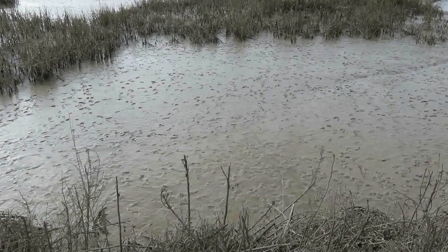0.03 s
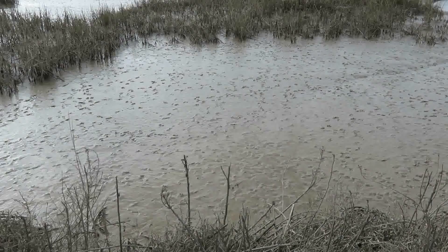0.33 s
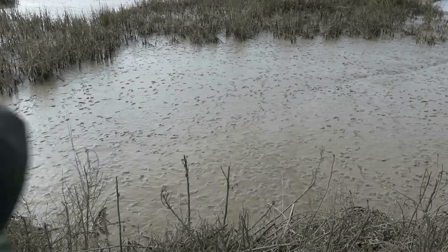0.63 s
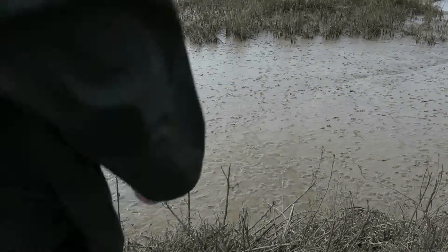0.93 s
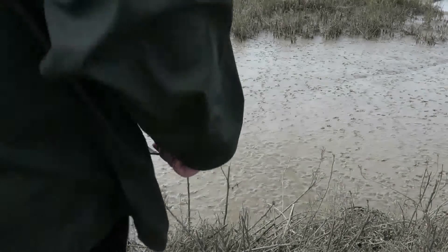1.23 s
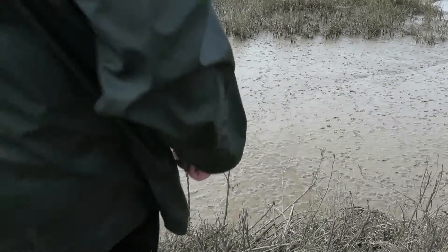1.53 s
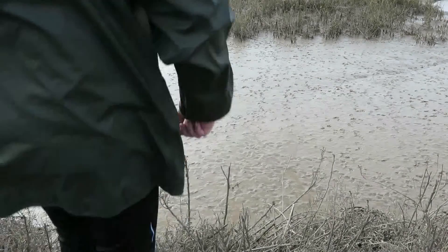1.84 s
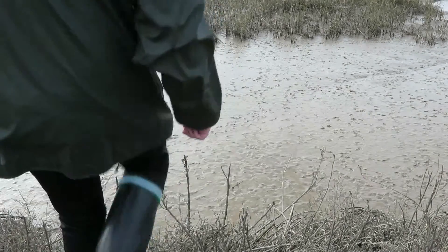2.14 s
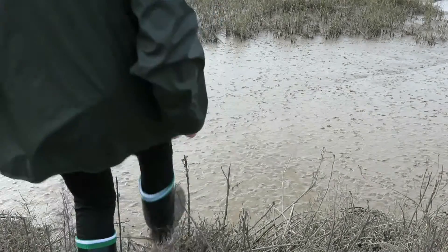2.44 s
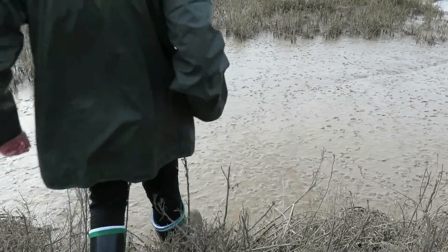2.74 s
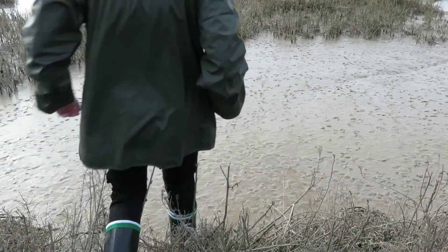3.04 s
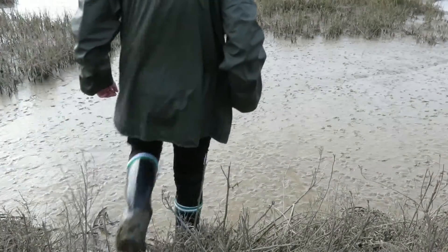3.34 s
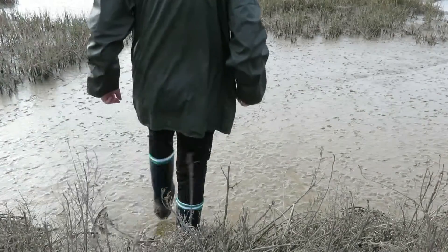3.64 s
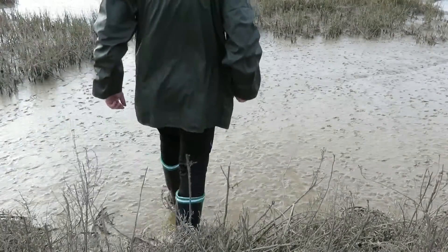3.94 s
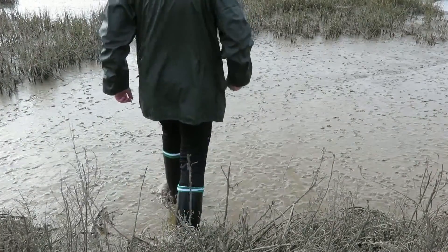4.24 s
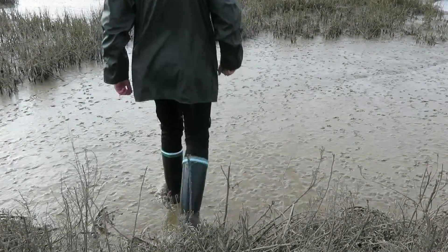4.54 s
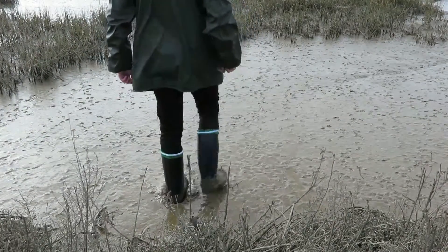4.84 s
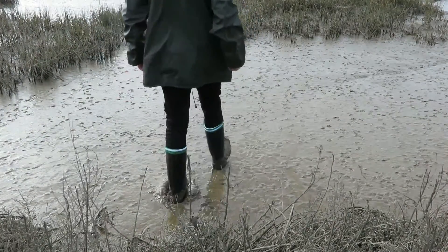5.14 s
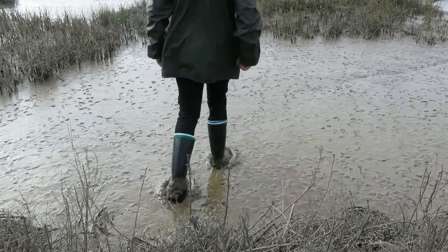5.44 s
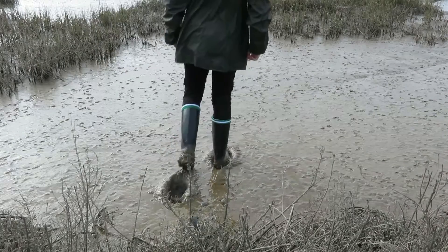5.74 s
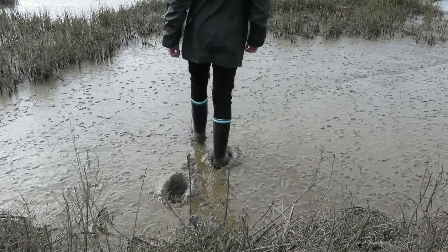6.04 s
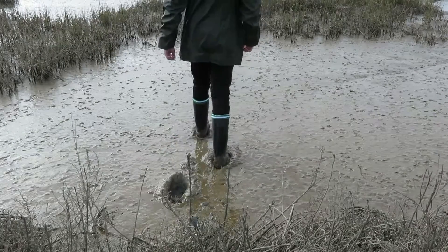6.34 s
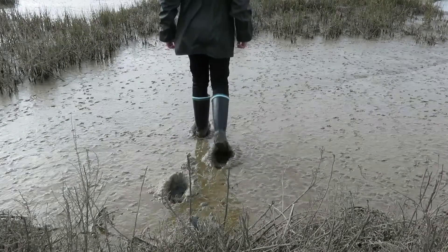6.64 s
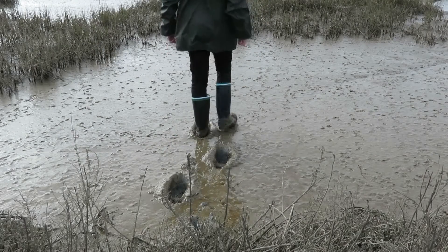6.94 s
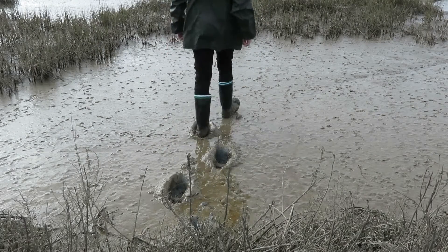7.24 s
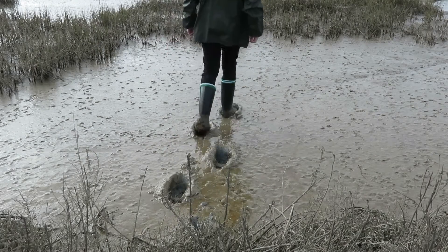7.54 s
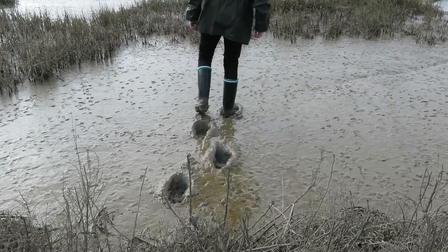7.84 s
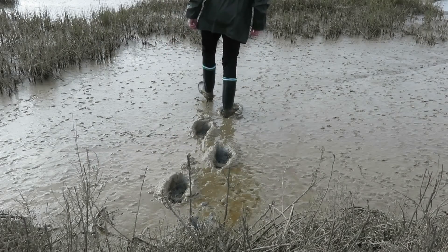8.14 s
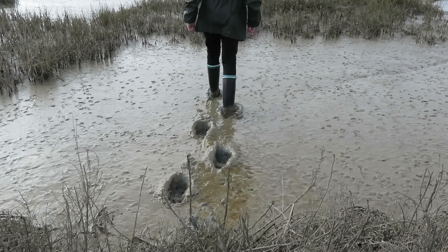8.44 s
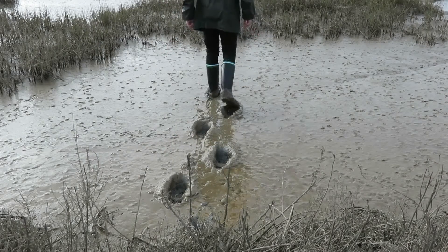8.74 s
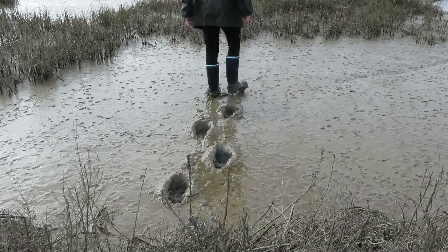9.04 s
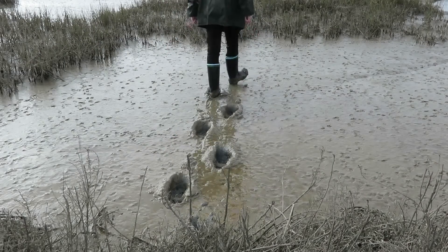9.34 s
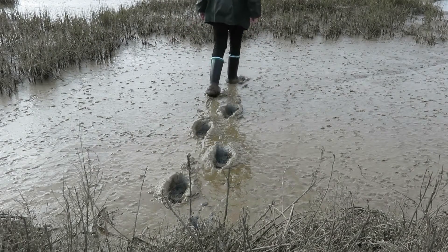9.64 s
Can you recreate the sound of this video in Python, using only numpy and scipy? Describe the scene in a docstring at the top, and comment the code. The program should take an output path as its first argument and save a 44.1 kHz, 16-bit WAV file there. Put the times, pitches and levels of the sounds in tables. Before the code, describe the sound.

Rubber boots brush through dry grass with stalks snapping, then squelch in wet mud, while wind gusts buffet the microphone.

```python
"""Boots through grass and mud

A walker in a waxed coat and rubber boots brushes through dry grass; stalks snap and crack.
Out on a mud flat the boots squelch and squeak, wet films click and trapped air gurgles.
Gusts and eddies buffet the microphone over the steady hush of open country."""
import sys
import numpy as np
from scipy.fft import rfft, irfft, next_fast_len
from scipy.io import wavfile
from scipy.ndimage import uniform_filter1d, map_coordinates

SR = 44100
rng = np.random.default_rng(int(sys.argv[2]) if len(sys.argv) > 2 else 0)


def generate_wav(sig):
    """Save sig (samples, or channels by samples) to the path in sys.argv[1] as 16-bit PCM at SR."""
    pcm = np.round(np.clip(np.atleast_2d(sig).T, -1, 1) * 32767).astype(np.int16)
    wavfile.write(sys.argv[1], SR, pcm)


N = 426888
TIME_S = np.arange(N) / SR

# Table levels precede each source's gain.
# air and slurry forced past a boot: (crest [s], rise [s], fall [s], level [dB], pitch [Hz], spray [dB])
BOOT_SQUELCHES = [(4.15, 0.0036, 0.016, -37, 2580, -2), (4.194, 0.0054, 0.035, -38.5, 1900, -13),
                  (5.367, 0.012, 0.037, -46, 2800, 1), (5.439, .001, 0.011, -29, 660, -30),
                  (5.4404, 0.0061, 0.0073, -23.5, 2100, -11.5), (5.447, 0.0025, .002, -26, 2850, -3),
                  (5.454, 0.0018, .008, -35, 2200, -11), (6.395, 0.0059, 0.035, -51.5, 2680, 6.5),
                  (7.501, 0.003, .012, -26, 1980, -22), (7.509, 0.004, 0.007, -13.5, 2980, -18),
                  (7.516, .002, 0.0083, -16, 2950, -19), (7.518, 0.00026, 0.0041, -15, 2880, -17),
                  (7.526, 0.004, 0.0092, -20, 2900, -5.5), (7.534, .002, 0.0012, -14, 2830, -21),
                  (7.5462, 0.0019, 0.0024, -10, 2900, -17), (7.55, 0.00035, 0.0025, -13.5, 1550, -22),
                  (7.551, 0.0006, 0.0029, -7, 2900, -16), (7.552, .001, .002, -8.5, 4280, -12),
                  (7.5555, 0.00067, 0.0027, -15, 2750, -12), (8.492, 0.0021, 0.0069, -42, 2840, -14),
                  (8.614, 0.0034, 0.0086, -36, 2880, -14)]
# mud pocket modes: (ratio to pitch [1], width [Hz], gain [dB])
POCKET_MODES = [(.25, 455, -41), (.53, 170, 3.5), (.78, 220, 2.5), (1, 190, 7.5), (1.27, 130, -0.5),
                (1.5, 350, -0.5), (1.86, 380, -17)]
# heel suction letting go: (time [s], level [dB], pitch [Hz], decay [s])
HEEL_SMACKS = [(5.4382, -7, 1770, 0.00071), (5.4385, -14, 960, .0018), (5.44, -26, 660, .007),
               (7.5176, -5, 2250, .0007), (7.5465, -15.5, 286, 0.0062), (7.5497, -15, 990, .0007),
               (7.5515, -17.5, 610, 0.0024)]
# wet films parting under the soles: (time [s], crack [dB], ring [dB], ring pitch [Hz])
FILM_CLICKS = [(4.5984, -39, -31.5, 5060), (4.648, -35, -43, 4500), (5.3567, -48, -32, 4800),
               (5.3625, -50, -28, 2490), (5.373, -45, -30, 3800), (5.6316, -46, -41, 13000),
               (5.6426, -42, -39, 13000), (5.6585, -35, -29, 12500), (5.6999, -27.5, -32, 10900),
               (6.3784, -39, -35, 2000), (6.6667, -37, -47, 13000), (7.2724, -42, -33, 4000),
               (7.4036, -26.5, -25.5, 4970), (7.7119, -32, -23, 12000), (8.4884, -25.5, -32, 4470),
               (8.7176, -42, -31, 11000), (8.7382, -47, -31, 3820), (8.8231, -26, -29, 3000),
               (8.8553, -44, -45, 2900), (8.881, -48, -41, 10500), (9.5706, -32.5, -18.5, 8700)]
# mud oozing as a boot sinks or lifts: (start [s], length [s], level [dB])
OOZE_SPANS = [(5.36, 0.15, -54), (5.63, 0.049, -48.5), (5.78, 0.033, -57), (6.33, 0.17, -60),
              (6.5, 0.52, -61), (7.28, 0.017, -56), (7.69, 0.055, -58), (8.54, 0.17, -61.5),
              (9.46, .02, -59), (9.58, 0.096, -64)]
# trapped air ringing in boot holes: (start [s], length [s], level [dB], pitch [Hz])
BUBBLE_STRINGS = [(4.133, 0.006, -31.5, 3160), (5.461, 0.0036, -34, 2250), (5.479, 0.0037, -36, 2550),
                  (5.968, 0.004, -42.5, 3500), (6.222, 0.004, -44, 3140), (6.347, 0.0047, -39, 3040),
                  (7.086, 0.004, -37.5, 2480), (7.402, 0.008, -40, 3100), (7.955, 0.022, -39, 2310)]
# boot shaft rubbing: (time [s], level [dB], pitch [Hz])
SQUEAK_CURVE = [(4.19, -75, 1980), (4.23, -51, 1950), (4.27, -47, 1910), (4.31, -44, 1830),
                (4.35, -75, 1800)]

# steady brushing of coat and grass: (time [s], swish [dB], hiss [dB])
BRUSH_CURVE = [(.45, -53, -65.5), (.64, -47, -61), (1.1, -54.5, -60.5), (1.5, -54.5, -58.5),
               (2.0, -63, -62.5), (2.35, -57, -56.5), (2.45, -53, -49.5), (2.6, -52, -47.5),
               (2.85, -48, -50.5), (3.05, -45, -51.5), (3.4, -49, -48), (3.65, -53, -45), (3.9, -61, -65),
               (4.2, -56.5, -62.5), (4.75, -63, -62)]
# sleeve or boot swings through grass: (start [s], length [s], swish [dB], hiss [dB])
BRUSH_STROKES = [(.7, .06, -47, -51), (.77, 0.074, -36.5, -46.5), (.92, .04, -47, -50.5),
                 (1.235, .11, -50, -48), (1.65, 0.099, -45, -52.5), (2.16, 0.09, -55, -51),
                 (2.47, .16, -46, -45.5), (2.95, 0.15, -50, -52.5), (3.24, .06, -52, -47),
                 (3.46, .1, -46.5, -47.5), (3.74, .03, -54, -50)]
# dry stalks and coat folds snapping: (time [s], crack [dB], ring [dB], ring pitch [Hz])
STALK_SNAPS = [(.499, -31, -38, 4300), (.5387, -31, -28, 3380), (.555, -24, -24, 3400),
               (.6633, -47, -29, 2400), (.6908, -41, -33, 4000), (.7062, -46, -28, 2500),
               (.7427, -46, -34, 6040), (.7646, -29, -20.5, 4600), (.8177, -17.5, -16, 7500),
               (.9462, -36, -33, 4300), (1.1822, -34, -34, 2900), (1.2296, -28.5, -31, 6240),
               (1.4112, -36, -32, 3320), (1.6541, -24.5, -41, 5060), (1.6915, -37, -22, 5200),
               (1.7225, -28.5, -45, 2300), (1.902, -30, -37, 2200), (1.9759, -35, -30, 4230),
               (2.0263, -32, -30, 13000), (2.2004, -40, -32, 3880), (2.5231, -46, -23, 13000),
               (2.5486, -30, -48, 2100), (2.5994, -26, -20, 12000), (2.6235, -21.5, -21, 9000),
               (2.6548, -26, -33, 6000), (2.6892, -27, -31, 7700), (2.7506, -34, -41, 7300),
               (2.7742, -25.5, -27, 3500), (2.88, -28.5, -26, 13500), (2.9487, -42, -34, 4400),
               (2.9776, -27, -28, 2000), (3.003, -30, -22.5, 3070), (3.1228, -18.5, -31, 3600),
               (3.238, -45, -47, 2100), (3.2944, -38, -28, 2600), (3.5533, -41, -34, 2300),
               (3.6933, -17.5, -29, 3620), (3.802, -27.5, -37, 5750)]
# thick stalks cracking under a heel: (time [s], level [dB], pitch [Hz], decay [s])
STALK_CRACKS = [(1.6925, -19, 5000, .0003), (2.9497, -22, 4380, .0005), (2.966, -23, 3000, .0002),
                (3.0025, -12.5, 2240, 0.00059), (3.0035, -18, 5400, 0.00025),
                (3.0048, -14.5, 3600, 0.00046), (3.0207, -24, 3400, .0005), (3.1237, -9, 3380, .00042),
                (3.124, -12.5, 2280, 0.00056), (3.151, -16, 2610, .0006), (3.6945, -19, 3630, .0005)]

# light air: (time [s], level [dB])
BREEZE_CURVE = [(0.08, -29), (0.24, -40), (0.44, -42), (0.6, -34.5), (0.8, -24), (1.0, -40), (1.42, -25),
                (1.7, -29.5), (2.11, -37.5), (2.4, -28), (2.86, -41), (3.08, -30), (3.42, -28),
                (4.02, -23.5), (4.25, -32.5), (4.76, -39), (4.92, -35), (5.3, -42), (5.51, -55),
                (5.65, -49.5), (6.3, -51), (7.18, -59.5), (7.92, -43), (8.36, -30), (8.98, -44),
                (9.38, -35.5), (9.68, -44)]
# gusts on the microphone: (start [s], length [s], level [dB])
GUST_SPANS = [(.172, 0.0094, -27.5), (.305, 0.085, -23.5), (.509, 0.017, -27), (.768, 0.031, -17.5),
              (.808, 0.042, -22.5), (.855, 0.023, -19), (.92, 0.037, -27), (1.195, 0.12, -27.5),
              (1.23, 0.039, -24.5), (1.375, 0.06, -21.5), (1.455, 0.07, -19.5), (1.535, 0.055, -18),
              (1.59, 0.036, -21), (1.742, 0.047, -22.5), (1.878, 0.075, -16), (2.0, 0.019, -23),
              (2.188, 0.022, -15.5), (2.21, 0.047, -24), (2.27, 0.16, -16.5), (2.445, 0.052, -16),
              (2.58, 0.045, -23), (2.725, 0.0099, -29.5), (2.951, 0.068, -15), (3.025, 0.041, -14),
              (3.075, 0.056, -16), (3.15, 0.065, -23), (3.304, 0.087, -15.5), (3.458, .03, -24.5),
              (3.495, 0.084, -21), (3.6, 0.015, -26.5), (3.679, 0.092, -18), (3.785, 0.023, -20),
              (3.895, 0.037, -16.5), (4.05, .012, -20.5), (4.1, 0.027, -15.5), (4.18, 0.024, -21.5),
              (4.283, 0.051, -19.5), (4.35, 0.1, -23), (4.45, 0.014, -15), (4.475, 0.028, -27),
              (4.518, 0.012, -19), (4.56, 0.08, -22.5), (4.808, 0.046, -21.5), (4.952, 0.0092, -29),
              (4.985, .01, -29.5), (5.145, 0.0095, -26.5), (5.25, 0.037, -30.5), (5.365, 0.074, -32.5),
              (5.727, .008, -26), (5.78, 0.02, -29.5), (5.81, .075, -37), (5.94, 0.078, -40.5),
              (6.11, 0.011, -42), (6.345, .012, -44), (6.755, 0.024, -31), (6.825, 0.012, -32),
              (6.865, 0.035, -34), (6.93, 0.02, -31.5), (6.975, 0.037, -32), (7.065, 0.0086, -33.5),
              (7.47, 0.13, -37.5), (7.86, 0.02, -36.5), (7.98, 0.018, -34.5), (8.138, 0.021, -30.5),
              (8.187, 0.02, -27), (8.28, 0.0073, -27.5), (8.365, 0.024, -25), (8.413, 0.044, -18),
              (8.488, 0.0081, -17.5), (8.545, 0.042, -23.5), (8.635, 0.024, -25.5), (8.685, 0.011, -21.5),
              (8.73, 0.029, -32), (9.022, 0.039, -29), (9.203, 0.04, -26.5), (9.293, 0.023, -22.5),
              (9.463, 0.018, -23), (9.652, 0.0085, -35)]
# hardest eddies: (time [s], thump [dB], core [dB])
HARD_EDDIES = [(.3365, -6, -18), (.3963, -9.5, -30), (.771, -5.5, -23), (.821, -2, -16), (.8305, -5, -11),
               (.8342, 0.5, -5.5), (1.4667, -0.5, -7), (1.8851, -10, -13), (1.9058, 1, -4.5),
               (1.9289, -1, -8.5), (1.9736, -2, -6.5), (2.293, -5, -15), (2.3625, -4, -15.5),
               (2.466, 1, -6.5), (2.4849, -4, -8.5), (2.5288, -5.5, -16), (3.047, -2, -14),
               (3.0655, -0.5, -20), (3.3128, 0, -18), (3.383, -4, -33), (3.5081, 2, -8), (3.7408, -4, -19),
               (3.7537, -5, -9), (3.794, -6, -10.5), (3.9007, -3, -10.5), (4.1147, 1.5, -23),
               (4.2928, -4, -27), (4.321, -13, -13), (4.4595, -1, -20), (4.8244, -16, -20.5),
               (8.195, -10.5, -31), (8.427, -1, -20), (8.439, -10, -13), (8.4495, 1.5, -15.5),
               (8.49, -6, -31), (8.5006, -4, -39)]

# noise spectra: (frequency [Hz], relative density [dB])
SWISH_SPECTRUM = [(700, -16), (1350, -5), (2000, -4), (3200, -5), (5000, -5.5), (7500, -8.5), (14000, -20)]
HISS_SPECTRUM = [(2000, -6), (4500, 4.5), (6200, 4.5), (8000, 0), (10500, 3), (13000, 9), (14300, -1),
                 (15500, -26)]
CRACK_SPECTRUM = [(500, -14), (1500, 0), (5000, -1.5), (10000, -0.5), (13000, 6.5), (15500, -3)]
RUMBLE_SPECTRUM = [(15, -18), (30, -17), (60, -4.5), (100, -1), (180, -3.5), (350, -36), (900, -75)]
BUFFET_SPECTRUM = [(15, -35), (30, -30), (60, -22), (110, -5), (200, 0), (300, -3.5), (450, -15.5),
                   (700, -25.5), (950, -49), (1300, -56), (2500, -93)]
SWIRL_SPECTRUM = [(100, -46), (250, -7), (400, 3.5), (650, -3), (950, -10), (1250, -21), (1500, -26.5),
                  (2500, -36.5), (5000, -63)]
HUSH_SPECTRUM = [(60, -21), (200, -5), (450, -4), (700, 0.5), (900, 1.5), (1100, -2), (1350, -6.5),
                 (2200, -11), (3200, -14), (5000, -18.5), (9500, -29), (15000, -30)]
# left-right likeness: (frequency [Hz], coherence [1])
GRASS_COHERENCE = [(1500, 1), (3100, 0.95), (7000, 0.97), (13000, 0.18)]
WIND_COHERENCE = [(60, .999), (140, 1), (280, 0.99), (600, 0.87), (1200, 0.57)]
HUSH_COHERENCE = [(300, 1), (800, 0.99), (1500, 0.89), (3100, 0.66), (7000, 0.27), (14000, 0.13)]


def squelches():
    """The seal round a boot tears: wet pops ring an air pocket and throw fine spray."""
    out, t = np.zeros((2, N)), np.arange(SR // 3) / SR - .1
    for s, rise_s, fall_s, db, pitch_hz, spray_db in BOOT_SQUELCHES:
        # flow stops once the pocket fills
        gate = np.clip(3 - t / fall_s, 0, 1) * np.clip((.06 - t) / 0.012, 0, 1)
        flow = pulse(t, rise_s, fall_s) * gate
        bursts = flow * crackle(len(t), rate_hz=3000, scatter_db=1.2, bed=1.0)
        ring = unit(filtered(bursts, lambda hz: mud_pocket(hz, pitch_hz)))
        spray = amp(spray_db) * coloured(bursts, HISS_SPECTRUM)
        wet = spread(ring + spray, [(1600, 1.0), (5000, 0.96), (14000, 0.83)])
        add(out, s + t[0], amp(db) * rms(flow) * wet)
    return out * amp([[-.25], [.25]])


def mud_pocket(hz, pitch_hz, tear_db=-17):
    """Air pocket response: modes of alternating sign plus the low-passed tear."""
    modes = sum((-1) ** k * amp(db) * resonance(hz, ratio * pitch_hz, width_hz)
                for k, (ratio, width_hz, db) in enumerate(POCKET_MODES))
    return modes + amp(tear_db) / (1 + 1j * hz / pitch_hz)


def pops(rows):
    """A stalk or heel suction gives way at once, leaving a short, dry ring."""
    out, t = np.zeros((2, N)), np.arange(SR // 40) / SR
    for s, db, hz, decay_s in rows:
        add(out, s, amp(db) * np.sin(2 * np.pi * hz * t) * np.exp(-t / decay_s))
    return out


def film_clicks():
    """Wet films part under the soles."""
    return ticks(FILM_CLICKS, rise_s=0.00027, decay_s=0.0015, tail_s=0.016, tail_db=-18,
                 crack_db=-2, ring_db=-4.5, q=2.9, coherence=[(3000, 0.99), (12000, 0.89)])


def ooze(gain_db=-2, seep_db=-69, fade_db_per_s=3, ping_db=2):
    """Tiny bubbles burst as mud closes round a boot; the prints seep on, fading as the walker leaves."""
    fizz, = swells(OOZE_SPANS, attack_s=0.036, release_s=0.037)
    in_mud = np.interp(TIME_S, [4.7, 4.85], [0, 1])
    seep = amp(seep_db - fade_db_per_s * (TIME_S - OOZE_SPANS[0][0]))
    bursts = crackle(N, rate_hz=440, scatter_db=3, bed=0.52)
    froth = spread(coloured(bursts, HISS_SPECTRUM), [(4000, 1.0), (13000, 0.66)])
    pings = grains(count=1800, centre_hz=10500, pitch_scatter=.28, decay_cycles=1.6, scatter_db=6)
    return in_mud * amp(gain_db) * np.hypot(fizz, seep) * unit(froth + amp(ping_db) * pings)


def bubbles(rise_s=0.000092, decay_s=0.0014, rate_hz=260, pitch_scatter=0.039, glide_per_s=6):
    """Escaping air rings as quick strings of bubbles, each rising slightly in pitch."""
    out, t = np.zeros((2, N)), np.arange(SR // 40) / SR
    envelope = np.exp(-t / decay_s) * (1 - np.exp(-t / rise_s))
    for s, length_s, db, hz in BUBBLE_STRINGS:
        for delay_s in np.arange(0, length_s, 1 / rate_hz):
            pitch_hz = hz * np.exp(pitch_scatter * rng.standard_normal())
            ring = envelope * np.sin(2 * np.pi * pitch_hz * t * (1 + glide_per_s * t / 2))
            jitter_s = .5 * rng.random() / rate_hz
            add(out, s + delay_s + jitter_s, 1.8 * amp(db - 6 * delay_s / length_s) * ring)
    return out


def squeak(waver=0.06, flutter_db=3):
    """Wet rubber sticks and slips: a faint, rough tone that sags in pitch."""
    db, hz = curves(SQUEAK_CURVE)
    phase = 2 * np.pi * np.cumsum(hz * (1 + waver * wobble(400))) / SR
    return during(SQUEAK_CURVE) * amp(db + flutter_db * wobble(149.7)) * np.sin(phase)


def rustle(swish_gain, hiss_gain, swish_db=-1, clump_db=2, blade_db=-2):
    """Coat and dry grass rub in small slips, folds buckle and blades tick, while on the bank."""
    on_bank = np.interp(TIME_S, [.4, .5, 4.7, 4.85], [0, 1, 1, 0])
    clumps = amp(clump_db * wobble(45))
    folds = grains(count=3000, centre_hz=3600, pitch_scatter=.43, decay_cycles=1.5, scatter_db=2.2)
    blades = grains(count=4500, centre_hz=10500, pitch_scatter=0.24, decay_cycles=4, scatter_db=3.2)
    soft_slips = coloured(crackle(N, rate_hz=600, scatter_db=1.4, bed=1.0), SWISH_SPECTRUM)
    crisp_slips = coloured(crackle(N, rate_hz=700, scatter_db=1.2, bed=1.0), HISS_SPECTRUM)
    swish = unit(clumps * (spread(soft_slips, GRASS_COHERENCE) + folds))
    hiss = unit(clumps * (spread(crisp_slips, GRASS_COHERENCE) + amp(blade_db) * blades))
    return on_bank * (swish_gain * amp(swish_db) * swish + hiss_gain * hiss)


def brushing():
    """Swish and hiss gains: single strokes over steady brushing."""
    return np.hypot(amp(curves(BRUSH_CURVE)), swells(BRUSH_STROKES, attack_s=0.055, release_s=0.032))


def stalk_snaps(hiss_gain, count=85, scatter_db=5.5, centre_hz=5800, pitch_scatter=0.69):
    """Stalks and folds snap: listed breaks plus random ones, densest where brushing is hardest."""
    effort = hiss_gain * during(BRUSH_CURVE)
    at = rng.choice(N, size=count, p=effort / effort.sum())
    size, pitch = rng.standard_normal((count, 2)).T
    db = 20 * np.log10(hiss_gain[at]) + 5 + scatter_db * size
    small_snaps = np.c_[at / SR, db, db - 7, centre_hz * np.exp(pitch_scatter * pitch)]
    return ticks([*STALK_SNAPS, *small_snaps], rise_s=0.00029, decay_s=0.0031, tail_s=0.0091,
                 tail_db=-12.5, crack_db=-5, ring_db=-7, q=2.7, coherence=[(3000, 0.99), (12000, 0.99)])


def ticks(rows, rise_s, decay_s, tail_s, tail_db, crack_db, ring_db, q, coherence):
    """A sudden break: broad crack, after-crackles and a short ring at the broken piece's pitch."""
    out, t = np.zeros((2, N)), np.arange(SR // 14) / SR - .01
    envelope = pulse(t, rise_s, decay_s) + amp(tail_db) * pulse(t, 0.0023, tail_s)
    for s, row_crack_db, row_ring_db, ring_hz in rows:
        bursts = envelope * crackle(len(t), rate_hz=3000, scatter_db=5.3, bed=0.82)
        crack = amp(row_crack_db + crack_db) * coloured(bursts, CRACK_SPECTRUM)
        # reversed drive: the ring peaks about 50 ms after the crack
        ringing = filtered(bursts[::-1], lambda hz: resonance(hz, ring_hz, ring_hz / q))
        ring = amp(row_ring_db + ring_db) * unit(ringing)
        add(out, s + t[0] + 0.00098, rms(envelope) * spread(crack + ring, coherence))
    return out


def wind(strength_db, flutter_db=0.33, lull_flutter=0.09, flutter_hz=30, lump_db=4):
    """Pressure lumps on the microphone: light air rumbles, strong gusts break into brighter swirls."""
    # weak air is more fitful than a full gust
    depth_db = flutter_db + lull_flutter * (strength_db.max() - strength_db)
    gust_db = strength_db + depth_db * wobble(flutter_hz)
    force_db = gust_db + 23
    lumps_db = lump_db * wobble(70)
    rumble = amp(0.56 * force_db - 32.5) * rush(RUMBLE_SPECTRUM, WIND_COHERENCE)
    buffet = amp(gust_db - 1.5) * levelled(amp(lumps_db) * rush(BUFFET_SPECTRUM, WIND_COHERENCE))
    swirls = levelled(amp(lumps_db + 4 * wobble(230)) * rush(SWIRL_SPECTRUM, WIND_COHERENCE))
    return rumble + buffet + amp(1.37 * force_db - 32.5) * swirls


def wind_strength_db():
    """Gusts and breeze, summed in power."""
    breeze_db, = curves(BREEZE_CURVE)
    gusts, = swells(GUST_SPANS, attack_s=0.0096, release_s=0.0093)
    return 20 * np.log10(np.hypot(amp(breeze_db), gusts))


def eddies(rows, thump_hz=280, core_hz=800, imbalance=0.75, wake_db=-8):
    """An eddy thumps both microphone ports alike; its sharp core hits them unevenly in a short swirl."""
    out, t = np.zeros((2, N)), np.arange(SR // 14) / SR - .02
    for s, thump_db, core_db in rows:
        size, lean = rng.standard_normal(), rng.choice([-1, 1])
        thump = amp(thump_db - 3) * wavelet(t + 0.00054, thump_hz * np.exp(0.18 * size))
        port_gains = 1 + imbalance * lean * np.array([[1], [-1]])
        core = amp(core_db) * port_gains * wavelet(t, core_hz)
        swirl = spread(coloured(rng.standard_normal((2, len(t))), SWIRL_SPECTRUM), WIND_COHERENCE)
        wake = amp((thump_db + core_db) / 2 + wake_db) * pulse(t, 0.0018, 0.0054) * swirl
        add(out, s + t[0], rng.choice([-1, 1]) * (thump - core) + wake)
    return out


def small_eddies(strength_db, count=380, scatter_db=1, core_growth=0.39):
    """Loose train of eddies, harder and sharper in strong wind: (time [s], thump [dB], core [dB])."""
    at = ((np.arange(count) + rng.random(count)) * (N - 1) / count).astype(int)
    jitter_db = scatter_db * rng.standard_normal((count, 2))
    thump_db = strength_db[at] + jitter_db[:, 0]
    core_db = thump_db - 10.5 + core_growth * (strength_db[at] - strength_db.max()) + jitter_db[:, 1]
    return np.c_[at / SR, thump_db, core_db]


def hush(level_db=-46.5, swell_db=2, swell_decay_s=1.5):
    """Far wind over the marsh, nearly steady after an opening swell."""
    db = level_db + swell_db * np.exp(-TIME_S / swell_decay_s) + 0.35 * wobble(1.5)
    return amp(db) * rush(HUSH_SPECTRUM, HUSH_COHERENCE)


def amp(db):
    """Decibels to gain."""
    return 10 ** (np.asarray(db) / 20)


def rms(x):
    """Root mean square, never zero."""
    return np.sqrt(np.mean(x ** 2) + 1e-20)


def unit(x):
    """Scale to rms 1."""
    return x / rms(x)


def levelled(x, window=2000):
    """Hold running rms near 1, keeping the fast grain."""
    power = uniform_filter1d(uniform_filter1d(np.mean(x ** 2, axis=0), window), window)
    return x / np.sqrt(np.abs(power) + 1e-9)


def along(points, hz):
    """Interpolate on a log frequency axis."""
    knots_hz, values = np.transpose(points)
    return np.interp(np.log(hz + 1), np.log(knots_hz + 1), values)


def curves(rows):
    """One per-sample curve for each column after time."""
    s, *columns = np.transpose(rows)
    return [np.interp(TIME_S, s, column) for column in columns]


def during(rows):
    """Gate, open from first row to last."""
    return (TIME_S > rows[0][0]) & (TIME_S < rows[-1][0])


def swells(rows, attack_s, release_s):
    """Rows rise, hold and decay; one gain curve per dB column."""
    power = np.zeros((len(rows[0]) - 2, N))
    for s, length_s, *db in rows:
        a, b = np.searchsorted(TIME_S, [s - 10 * attack_s, s + length_s + 10 * release_s])
        t = TIME_S[a:b] - s
        shape = np.exp(np.minimum(np.minimum(t / attack_s, (length_s - t) / release_s), 0))
        power[:, a:b] += (amp(db)[:, None] * shape) ** 2
    return np.sqrt(power)


def pulse(t, rise_s, decay_s):
    """Exponential rise and decay, peak at t = 0."""
    return np.exp(np.minimum(t / rise_s, -t / decay_s))


def wavelet(t, hz):
    """One pressure peak between two shallow troughs."""
    u = (np.pi * hz * t) ** 2
    return (1 - 2 * u) * np.exp(-u)


def wobble(rate_hz):
    """Smooth random curve with knots at rate_hz."""
    return map_coordinates(rng.standard_normal(int(N * rate_hz / SR) + 4), [TIME_S * rate_hz])


def rush(spectrum, coherence):
    """Smooth stereo noise, rms 1."""
    return unit(spread(coloured(rng.standard_normal((2, N)), spectrum), coherence))


def crackle(n, rate_hz, scatter_db, bed):
    """Two rows of uneven impulses on a noise bed, rms 1."""
    sizes = amp(scatter_db * np.minimum(rng.exponential(size=n), 4))
    bursts = (rng.random(n) < rate_hz / SR) * sizes * rng.standard_normal((2, n))
    return unit(unit(bursts) + bed * rng.standard_normal((2, n)))


def grains(count, centre_hz, pitch_scatter, decay_cycles, scatter_db):
    """Tiny random impacts, each ringing at its own pitch; rms 1."""
    at = rng.integers(N, size=(count, 1))
    hz = np.minimum(centre_hz * np.exp(pitch_scatter * rng.standard_normal((count, 1))), SR / 2)
    sizes = amp(scatter_db * np.minimum(rng.exponential(size=(count, 1)), 4))
    k = np.arange(SR // 150)
    cycles = hz * k / SR
    rings = sizes * np.sin(2 * np.pi * cycles) * np.exp(-cycles / decay_cycles) * (1 - np.exp(-cycles))
    return unit(np.bincount((at + k).ravel(), rings.ravel(), N)[:N])


def resonance(hz, centre_hz, width_hz):
    """Two-pole band-pass response."""
    return 1j * hz * width_hz / (centre_hz ** 2 - hz ** 2 + 1j * hz * width_hz)


def filtered(x, response):
    """Apply a complex frequency response."""
    n = x.shape[-1]
    padded = next_fast_len(n + 8192)
    return irfft(rfft(x, padded) * response(np.fft.rfftfreq(padded, 1 / SR)), padded)[..., :n]


def coloured(x, spectrum):
    """Shape by a spectrum, rms 1."""
    return unit(filtered(x, lambda hz: amp(along(spectrum, hz))))


def spread(pair, coherence):
    """Two unrelated signals to left and right of given coherence."""
    angle = lambda hz: np.arccos(np.clip(along(coherence, hz), -1, 1)) / 2
    mid, side = filtered(pair, lambda hz: np.array([np.cos(angle(hz)), np.sin(angle(hz))]))
    return np.array([mid + side, mid - side])


def from_left(pair, lead_s):
    """Left channel leads right by lead_s."""
    return filtered(pair, lambda hz: np.exp(1j * np.pi * hz * lead_s * np.array([[1], [-1]])))


def add(track, s, sound):
    """Mix into a stereo track at s seconds."""
    i = max(round(s * SR), 0)
    track[:, i:i + sound.shape[-1]] += sound[..., :max(N - i, 0)]


def scene():
    """Open air, no echo: grass bank slightly left, then mud; wind throughout."""
    strength_db = wind_strength_db()
    swish_gain, hiss_gain = brushing()
    stalks = stalk_snaps(hiss_gain) + pops(STALK_CRACKS)
    films = film_clicks()
    bank = from_left(rustle(swish_gain, hiss_gain) + stalks, lead_s=.000024)
    mud = films + ooze() + squelches() + pops(HEEL_SMACKS) + bubbles() + squeak()
    air = wind(strength_db) + eddies([*HARD_EDDIES, *small_eddies(strength_db)])
    return bank + mud + air + hush()


def record(dry, start_s=.07, fade_s=.005, ceiling=.88, cutoff_hz=14500):
    """Brief silence and fade-in, soft peak limit, steep low-pass."""
    fade_in = np.clip((TIME_S - start_s) / fade_s, 0, 1)
    limited = dry / (1 + np.abs(dry / ceiling) ** 6) ** (1 / 6)
    return filtered(fade_in * limited, lambda hz: amp(-np.clip((hz - cutoff_hz) / 22, 0, 120)))


dry = scene()
out = record(dry)
generate_wav(out)
```